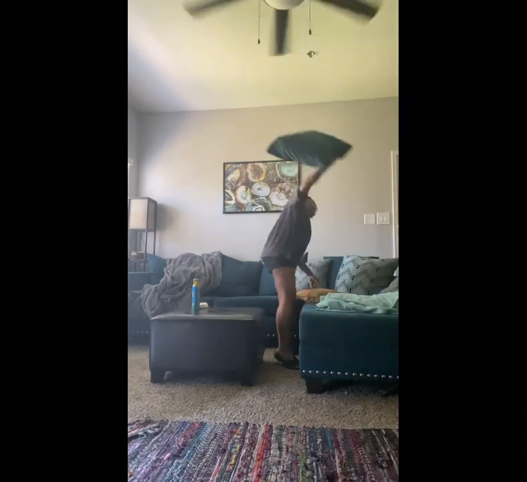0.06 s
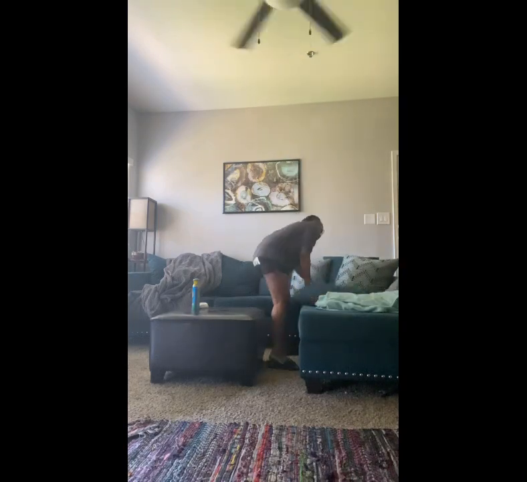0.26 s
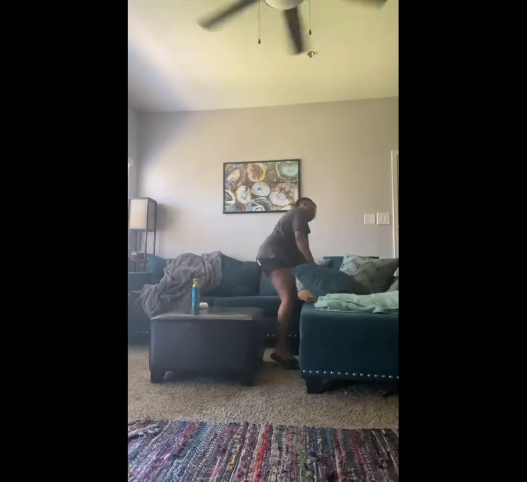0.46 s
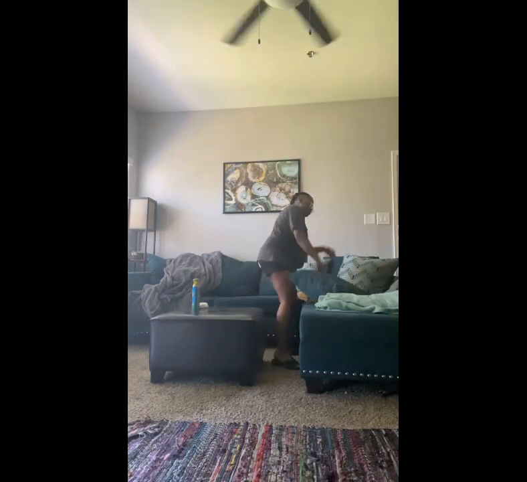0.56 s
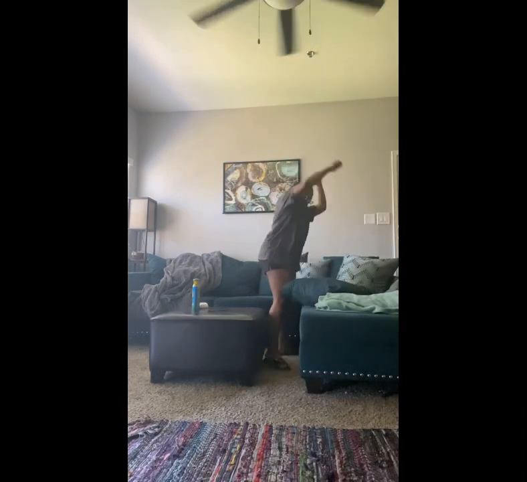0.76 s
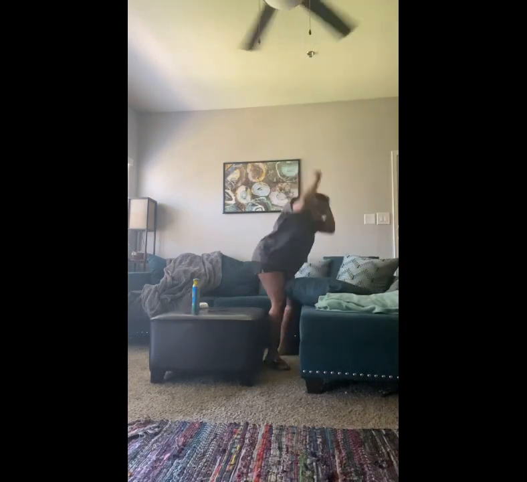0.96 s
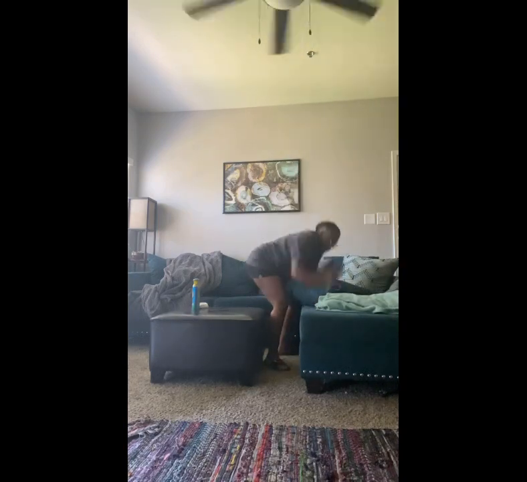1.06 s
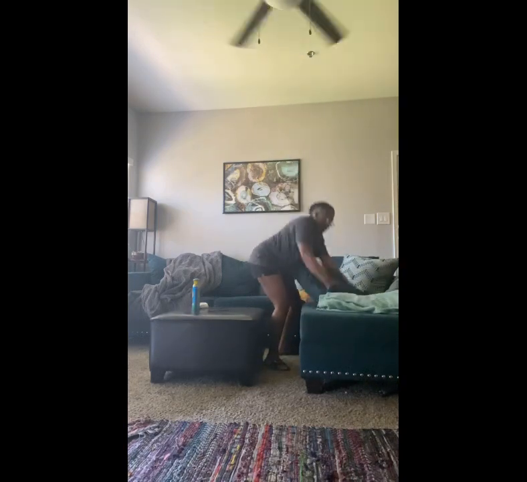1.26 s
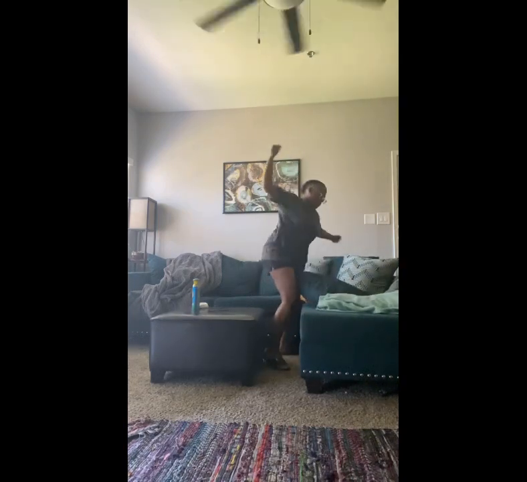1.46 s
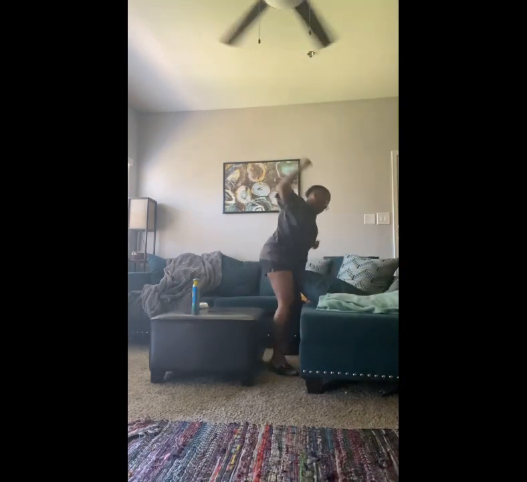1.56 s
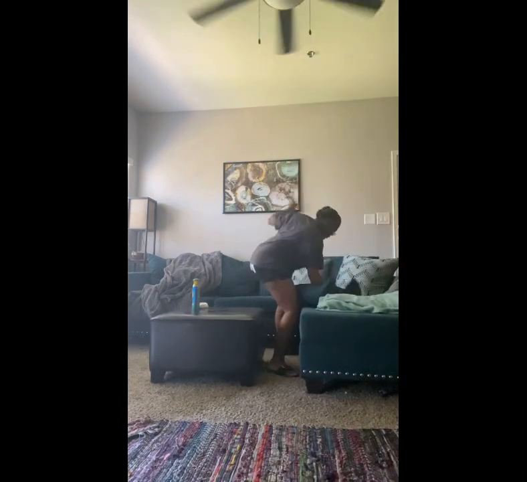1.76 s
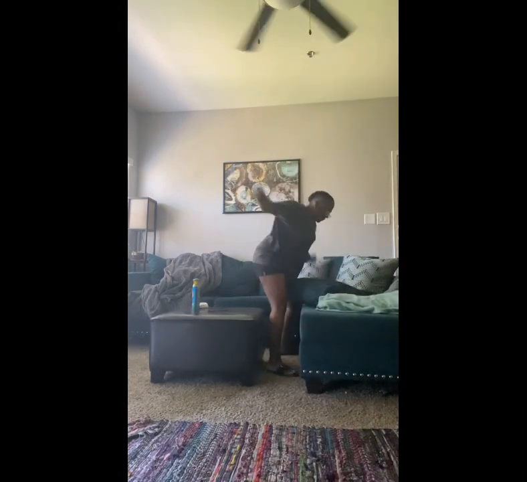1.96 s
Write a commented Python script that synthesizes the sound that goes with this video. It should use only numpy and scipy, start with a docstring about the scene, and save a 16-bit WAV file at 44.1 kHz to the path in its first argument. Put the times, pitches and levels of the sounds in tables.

```python
"""A carpeted living room under a ceiling fan, where soft sofa cushions are beaten by hand.
The fan is shaped noise with wavering hums; a small metal trinket tinkles as tiny random contacts set its
modes ringing, over a dying broad treble hiss. Cloth rustles as patchy hiss, with a narrow noisy peak near
3.2 kHz that drifts, a microphone resonance; feet and settling cushions thud as puffs of low noise.
Each blow slaps the cloth with many tiny clicks and pushes air out of the filling, and the room booms and
trails off. Two closely spaced microphone ports pick it up from across the room."""
import sys
import numpy as np
from scipy import signal
from scipy.fft import rfft, irfft, next_fast_len
from scipy.io import wavfile

SR = 44100
rng = np.random.default_rng(int(sys.argv[2]) if len(sys.argv) > 2 else 0)


def store_pcm(level_fs):
    """Save levels as 16-bit WAV."""
    pcm = np.round(np.clip(level_fs, -1, 1) * 32767).astype(np.int16)
    wavfile.write(sys.argv[1], SR, np.atleast_2d(pcm).T)


N = 88200  # samples: two seconds
# In the tables, t60 is the time a sound takes to fall by 60 dB.


def amp(db):
    """Turn dB into a plain multiplier."""
    return 10 ** (np.asarray(db) / 20)


def unit(x):
    """Scale to an rms (average strength) of 1."""
    return x / np.sqrt(np.mean(x ** 2) + 1e-20)


def at_hz(points, hz, count=1):
    """Read one column of a table at any pitch, sliding between rows over log frequency."""
    p = np.array(points, float)
    return np.interp(np.log(hz + 1), np.log(p[:, 0] + 1), p[:, count])


def band_filter(x, low, high, order=2):
    """Keep mostly the sound between two frequencies in Hz."""
    return signal.sosfilt(signal.butter(order, [low, high], "band", fs=SR, output="sos"), x)


def drift(rate):
    """Slow random wandering, rms 1: noise smoothed twice at rate Hz, made at every 40th sample."""
    r = np.exp(-2 * np.pi * rate * 40 / SR)
    noise = rng.standard_normal(N // 40 + 2002)
    slow = signal.lfilter([1], [1, -2 * r, r * r], noise)[2000:]  # skip the start-up
    return np.interp(np.arange(N) / 40, np.arange(len(slow)), unit(slow))


def ring(x, hz, t60):
    """A resonance: a click of height 1 sets off a dying sine that starts near height 1."""
    r, w = amp(-60 / (t60 * SR)), 2 * np.pi * hz / SR
    return signal.lfilter([0, np.sin(w)], [1, -2 * r * np.cos(w), r * r], x + 1e-18)


def fall(s, rise, t60):
    """Loudness curve: silent until s, then a smooth rise and an exponential decay."""
    t = np.maximum(np.arange(N) / SR - s, 0)
    return (1 - np.exp(-(t / rise) ** 2)) * amp(-60 * t / t60)


def bands(source, spectrum, alike, gain):
    """Split noise into third-octaves, each with its level, likeness of the ports and envelope gain(hz)."""
    out = 0
    edges = 25 * 2 ** (np.arange(29) / 3)
    for k, (low, high) in enumerate(zip(edges, edges[1:])):
        # neighbouring bands take turns between two draws
        mid, side = band_filter(source[k % 2], low, high)
        hz = np.sqrt(low * high)
        c = np.clip(at_hz(alike, hz), 0, 1)
        pair = np.sqrt(1 + c) * mid + np.sqrt(1 - c) * side * [[1], [-1]]
        out = out + amp(at_hz(spectrum, hz)) * gain(hz) * pair
    return out


# tone of the fan's air, relative: f/Hz, level/dB (per Hz)
FAN_AIR = [(12, -40), (20, 10.5), (110, -6), (228, -22.5), (301, 0), (1260, -21.5), (1610, -30),
           (1860, -46.5), (2990, -21), (3740, -30), (6360, -42.5), (7310, -17), (9140, -53.5), (13900, -56),
           (16000, -31.5)]
# how alike the two ports hear steady noise, also used for the rustle: f/Hz, likeness (0 to 1)
STEADY_ALIKE = [(60, 1), (300, .93), (700, .8), (1500, .35), (5000, .4), (15000, .85)]
# the fan's hums: f/Hz, nominal width/Hz, level/dB
FAN_HUMS = [(104, 4.5, -54.5), (181.7, 16, -62), (65.5, 22, -59)]
FAN_AIR_DB = -62


def fan():
    """Moving air is noise whose bands flutter; noise through narrow resonances gives wavering hums."""
    noise = rng.standard_normal((2, 2, N))
    air = unit(bands(noise, FAN_AIR, STEADY_ALIKE, lambda hz: amp(3.1 * drift(10))))
    hum = 0
    for hz, width, db in FAN_HUMS:
        # one extra second lets the resonance settle first
        tone = ring(rng.standard_normal(N + SR), hz, 3.2 / width)[SR:]
        hum = hum + amp(db) * unit(tone)
    return amp(FAN_AIR_DB) * air + hum


# trinket touches, relative: t/s, level/dB, extra level/dB of the lower modes and treble hiss
TRINKET_TOUCHES = [(0.001, -45, -4.5), (.062, -48, -15), (.102, -35, -12), (.222, -31.5, -9.5),
                   (.245, -72, -10), (.38, -73.5, 10), (.46, -82, -8), (.535, -63.5, 6.5),
                   (.595, -41, -10.5), (0.659, -76, 8), (.84, -69, -3.5), (.915, -54.5, -6),
                   (.95, -65.5, 3), (1.075, -56.5, 4), (1.15, -54.5, -8), (1.40, -53.5, -18.5),
                   (1.45, -69, -23)]
# high and lower ringing modes of the metal, relative: f/Hz, level/dB, t60/s
HIGH_MODES = [(15475, 0, .12), (15530, -1, .12), (15370, -9, .08), (15640, -8, .08)]
LOWER_MODES = [(5040, -9, .05), (5700, -12, .035), (6200, -14, .03), (12700, -3, .04), (11600, -10, .01),
               (9500, -14, .01), (13500, -14, .01)]
# the range of the treble hiss: lowest f/Hz, highest f/Hz
TREBLE_RANGE = (6000, 13500)
TREBLE_DB, RINGING_DB = -10, -5.5  # gains of the treble hiss and of the ringing
TOUCH_T60_S, CONTACTS_PER_S = 0.24, 2600  # decay of a touch, average contacts per second
MODE_SKIRT_HZ = 500  # each mode is kept mostly within this distance of its pitch


def trinket():
    """Tiny contacts in each touch set the metal's modes ringing, over a dying broad treble hiss."""
    high = sum(amp(db) * fall(s, 0.0027, TOUCH_T60_S) for s, db, _ in TRINKET_TOUCHES)
    lower = sum(amp(db + extra) * fall(s, 0.001, TOUCH_T60_S) for s, db, extra in TRINKET_TOUCHES)
    contacts = rng.random(N) < CONTACTS_PER_S / SR
    out = amp(TREBLE_DB) * band_filter(lower * rng.standard_normal(N), *TREBLE_RANGE)
    for modes, shake in ((HIGH_MODES, high), (LOWER_MODES, lower)):
        for hz, db, t60 in modes:
            ringing = ring(shake * contacts * rng.standard_normal(N), hz, t60)
            mode = band_filter(ringing, hz - MODE_SKIRT_HZ, hz + MODE_SKIRT_HZ, order=1)
            out = out + amp(db + RINGING_DB) * mode
    return out


# path of the rustle, in parts, level relative: t/s, level/dB, f/Hz (centre of the noisy peak)
RUSTLE_PATH = [
    [(0.0, -62, 3360), (0.086, -67.5, 3130), (0.094, -71, 3150), (0.118, -66.5, 3210), (0.124, -73, 3190),
     (0.166, -62.5, 3130), (0.19, -58, 3150)],
    [(0.36, -62.5, 3170), (0.368, -64.5, 3220), (0.538, -55, 3400), (0.636, -68.5, 3230),
     (0.782, -61.5, 2970), (0.922, -78, 3170), (1.03, -70, 3060)],
    [(1.19, -61, 3290), (1.352, -63, 3320), (1.438, -71.5, 3040), (1.454, -61, 3020), (1.506, -81, 3070),
     (1.57, -61.5, 3260), (1.66, -64, 3350)],
    [(1.8, -64.5, 3130), (1.868, -71, 3100), (1.878, -73, 3130), (1.91, -76.5, 3100), (1.934, -69.5, 3080),
     (1.95, -77.5, 3100)],
]
# tone of the cloth's hiss, relative: f/Hz, level/dB (per Hz)
CLOTH_TONE = [(290, -22.5), (500, 3.5), (923, -5), (1960, -16), (2630, -4.5), (3330, -9), (4460, -9),
              (6240, -18.5), (7370, -115.5), (7690, -45.5), (12300, -13.5), (14000, -43)]
HISS_DB, PEAK_DB = 0.5, -3
PEAK_WIDTH_HZ = 300


def rustle():
    """Cloth drags on cloth: patchy hiss with a narrow noisy drifting peak, as a microphone resonance."""
    points = np.array([row for part in RUSTLE_PATH for row in part])
    time = np.arange(N) / SR
    db = np.interp(time, points[:, 0], points[:, 1])
    hz = np.interp(time, points[:, 0], points[:, 2])
    shared = drift(27)  # wandering common to all bands
    noise = rng.standard_normal((2, 2, N))
    hiss = bands(noise, CLOTH_TONE, STEADY_ALIKE, lambda hz: amp(2.2 * shared + 1.1 * drift(45)))
    patchy = amp(0.83 * drift(42))
    # low noise carried up to the drifting centre of the peak
    low_pass = signal.butter(2, PEAK_WIDTH_HZ / 2, fs=SR, output="sos")
    slow = signal.sosfilt(low_pass, rng.standard_normal((2, N)))
    turn = 2 * np.pi * np.cumsum(hz) / SR
    peak = slow[0] * np.cos(turn) + slow[1] * np.sin(turn)
    return amp(db) * (amp(HISS_DB) * unit(hiss) + amp(PEAK_DB) * patchy * unit(peak))


# soft thuds of feet and settling cushions: t/s, level/dB (before the envelope), f/Hz
SOFT_THUDS = [(0.319, -22.5, 99.3), (.355, -27.5, 79.7), (.452, -35.5, 210), (0.528, -44.5, 280),
              (1.197, -47.5, 606), (1.45, -39, 194)]
THUD_T60_S = 0.067


def thuds():
    """Soft contacts make dull puffs: short bursts of noise in a band around each pitch."""
    out = 0
    for s, db, hz in SOFT_THUDS:
        puff = band_filter(rng.standard_normal(N), hz / 2.4, hz * 1.3)
        out = out + amp(db) * unit(puff) * fall(s, 0.0014, THUD_T60_S)
    return out


# the blows: t/s, then level/dB around each pitch of BLOW_PITCHES
BLOW_LEVELS = [(0.206, -14.5, -17, -16, -16.5, -17, -15, -13, -21, -24, -13.5, -30.5),
               (1.049, -26.5, -26, -11.5, -22.5, -19.5, -19.5, -24.5, -17.5, -27.5, -16, -34),
               (1.671, -32.5, -16, -19, -21, -22.5, -18.5, -18.5, -26, -32, -17.5, -32.5),
               (1.965, -39, -26, -32.5, -29, -36.5, -34.5, -45.5, -40.5, -43.5, -36, -43)]
# the pitches of those levels: f/Hz
BLOW_PITCHES = [75, 105, 190, 255, 370, 500, 800, 1100, 1700, 3200, 5300]


def colour(row, hz):
    """A blow's gain at hz, against the mean dB of the first three blows."""
    mean = np.mean(np.array(BLOW_LEVELS)[:3, 1:], axis=0)
    return amp(np.interp(np.log(hz), np.log(BLOW_PITCHES), np.array(row[1:]) - mean))


# low resonances of room and sofa, relative: f/Hz, level/dB, t60/s
BOOM_MODES = [(77.2, 6, .28), (104.1, 3, 0.25), (135.3, -6, 0.22), (188, 3.5, 0.15), (208.3, 5, 0.07),
              (252, 1.5, 0.18), (357.5, -12, 0.29), (493.4, 1.5, 0.14), (596, -15, 0.14),
              (656.5, -10.5, .16), (800, -9.5, 0.19), (920, -11, 0.12), (1046, -11.5, .12)]
BOOM_DB, PUSH_T60_S = -51, 0.04
PUSH_ROUGH = 2.0  # noise in the push, against a sine of height 1


def boom():
    """Each blow is a short rough push that sets the low resonances ringing."""
    out = 0
    for hz, db, t60 in BOOM_MODES:
        rise = at_hz(BLOW_SHAPE, hz)
        push = sum(colour(b, hz) * fall(b[0], rise, PUSH_T60_S) for b in BLOW_LEVELS)
        swing = np.sin(2 * np.pi * (hz * np.arange(N) / SR + rng.random()))
        rough = PUSH_ROUGH * rng.standard_normal(N)
        out = out + amp(db) * ring(push * (swing + rough), hz, t60)
    return amp(BOOM_DB) * out


# basic tone of a blow, relative: f/Hz, level/dB (per Hz)
BLOW_TONE = [(88, -29), (150, -5.5), (209, -3.5), (422, -11.5), (504, -4.5), (821, -11), (888, -16.5),
             (1040, -13), (1100, -19), (1830, -29.5), (3290, -20), (3920, -32.5), (6510, -42), (9260, -78),
             (12400, -53.5), (14500, -54.5), (16000, -30)]
# how a blow swells and dies: f/Hz, rise/s, t60/s of the blow, t60/s of the room, room level/dB (relative)
BLOW_SHAPE = [(59, 0.019, 0.26, 1, -24.5), (200, 0.0098, 0.18, 0.36, -15.5),
              (600, 0.0067, 0.088, 0.27, -10.5), (1700, 0.0039, 0.088, .25, -3.5),
              (3200, 0.0023, 0.11, .22, -9.5), (7000, 0.0018, 0.15, 0.3, -14)]
# how alike the ports hear the slaps, then the room's tail: f/Hz, likeness (0 to 1)
SLAP_ALIKE = [(60, 1), (700, .99), (1400, .7), (3000, .85), (5500, .4), (8000, .6), (15000, .99)]
ROOM_ALIKE = [(60, 1), (300, .98), (700, .9), (1500, .5), (5000, .5), (15000, .9)]
SLAPS_PER_S, SLAP_SPREAD_DB = 2500, 3.5  # average clicks per second, spread of their sizes
BLOW_DB, ROOM_RISE_S = 11.5, 0.014  # overall gain, extra rise time of the room's tail


def blows():
    """Uneven contacts, each band rising and dying at its own pace, then the room's smooth tail."""
    sizes = amp(SLAP_SPREAD_DB * np.minimum(rng.exponential(1, (2, N)), 4))
    signs = rng.choice([-1, 1], (2, 2, N))
    contacts = rng.random((2, N)) < SLAPS_PER_S / SR
    slaps = unit(sizes * signs * contacts)

    def direct(hz):
        """Envelope of the slaps in one band."""
        rise, t60 = at_hz(BLOW_SHAPE, hz), at_hz(BLOW_SHAPE, hz, count=2)
        return sum(colour(b, hz) * fall(b[0], rise, t60) for b in BLOW_LEVELS)

    def tail(hz):
        """Envelope of the room's answer in one band."""
        rise, t60, room_db = (at_hz(BLOW_SHAPE, hz, count=k) for k in (1, 3, 4))
        return amp(room_db) * sum(colour(b, hz) * fall(b[0], ROOM_RISE_S + rise, t60) for b in BLOW_LEVELS)

    slap_sound = bands(slaps, BLOW_TONE, SLAP_ALIKE, direct)
    room_sound = bands(rng.standard_normal((2, 2, N)), BLOW_TONE, ROOM_ALIKE, tail)
    return amp(BLOW_DB) * (slap_sound + room_sound)


def scene():
    """All sources together, from the background to the blows."""
    return fan() + trinket() + rustle() + thuds() + boom() + blows()


# microphone colour of what the ports share: f/Hz, level/dB
SUM_COLOUR = [(2000, 0), (2600, 0), (3300, 5), (4000, 0), (6700, -1), (7400, -14.5), (10000, -5),
              (12000, -8.5), (14500, -4.5), (15400, -10)]
# difference between the ports added from their shared sound: f/Hz, level/dB (against it), phase/radians
PORT_DIFFERENCE = [(60, -41.5, -3), (150, -32.5, -3), (350, -26, -5), (700, -28, -2), (1400, -2, -1.67),
                   (2790, -4, -1.0), (5600, 0.5, -1.48), (7550, 9, -1.63), (11200, 8.5, -1.5),
                   (13000, -12.5, -1.7), (15500, -27.5, -0.4)]
RUMBLE_CUT_HZ, TOP_CUT_HZ = 42.7, 16700


def record(dry):
    """The two ports differ in phase and level by frequency and colour the sound; rumble and top are cut."""
    size = next_fast_len(N + 2048)
    hz = np.arange(size // 2 + 1) * SR / size
    both = rfft(dry[0] + dry[1], size) / 2
    own = rfft(dry[0] - dry[1], size) / 2
    both = both * amp(at_hz(SUM_COLOUR, hz))
    turn = np.exp(1j * at_hz(PORT_DIFFERENCE, hz, count=2))
    apart = own + both * amp(at_hz(PORT_DIFFERENCE, hz)) * turn
    ports = irfft([both + apart, both - apart], size)[:, :N]
    ports = signal.sosfilt(signal.butter(3, RUMBLE_CUT_HZ, "high", fs=SR, output="sos"), ports)
    return signal.sosfilt(signal.cheby2(12, 70, TOP_CUT_HZ, fs=SR, output="sos"), ports)


dry = scene()
out = record(dry)
store_pcm(out)
```